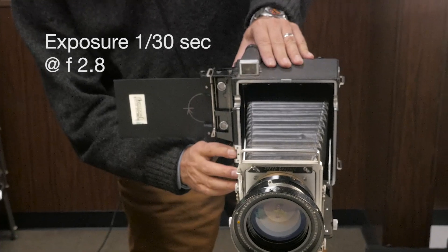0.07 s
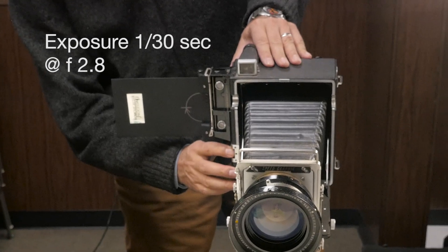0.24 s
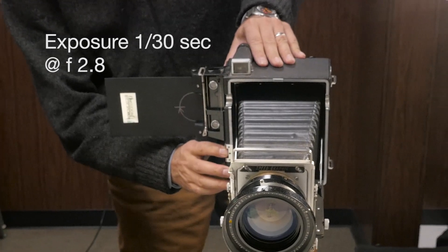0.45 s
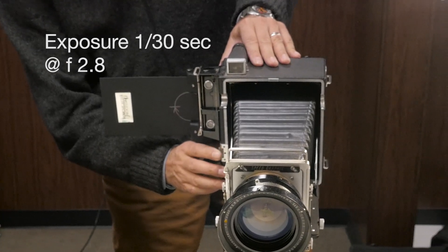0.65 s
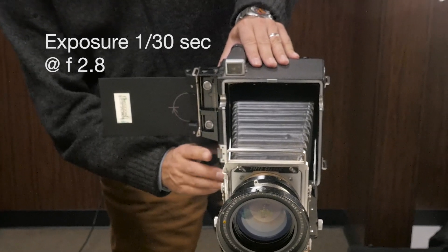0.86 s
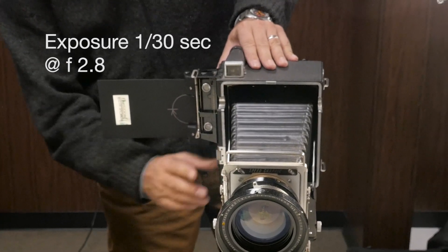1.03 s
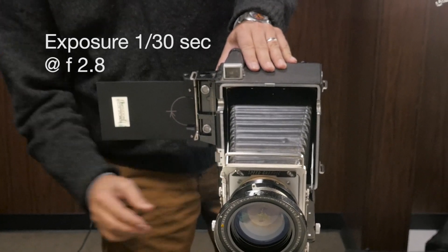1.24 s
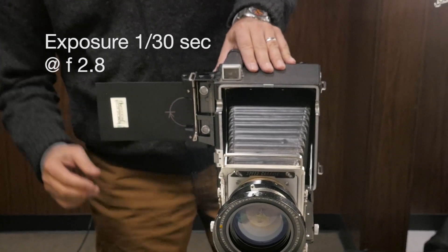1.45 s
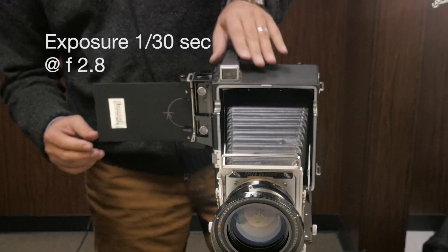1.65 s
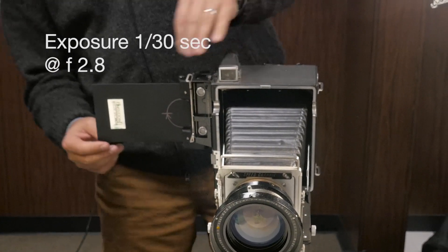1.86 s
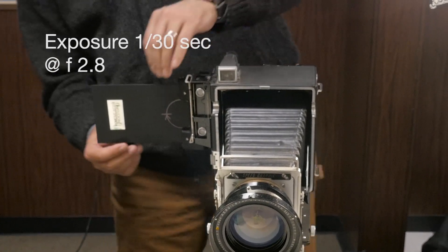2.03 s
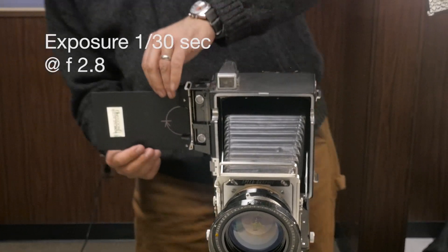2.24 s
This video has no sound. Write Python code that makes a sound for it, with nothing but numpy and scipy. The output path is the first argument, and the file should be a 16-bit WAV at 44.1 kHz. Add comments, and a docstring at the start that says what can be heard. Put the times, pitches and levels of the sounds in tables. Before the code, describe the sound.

Close stereo microphone in a small room: a spring-driven camera shutter runs with a ratcheting whirr and hard metallic clack, a low bump, a second brief clack, then faint taps, cloth rustle and soft bumps.

```python
"""A small room, where the spring-driven curtain shutter of a large-format camera runs twice.
Each run is a whirr: random tooth ticks and scrape noise through case resonances.
It ends in a clack against the stop: filtered noise bursts over a ringing frame. A catch pings at the first release.
Dull low thuds fall between the runs and, fainter, later on.
Then come light taps of handling, made of band-shaped noise, and a shuffle of clothing, over quiet room noise."""
import sys
import numpy as np
from scipy import signal
from scipy.fft import rfft, irfft
from scipy.io import wavfile

SR = 44100
rng = np.random.default_rng(int(sys.argv[2]) if len(sys.argv) > 2 else 0)


def wav_out(sig):
    """Save sig, one row per channel (or a flat mono array), as 16-bit PCM at SR to the path in sys.argv[1]."""
    wavfile.write(sys.argv[1], SR, np.round(np.clip(np.atleast_2d(sig).T, -1, 1) * 32767).astype(np.int16))


N = 101429

# Room noise spectrum. Each row: frequency in Hz, relative density in dB per Hz.
AIR_SPECTRUM = [(10, -32), (25, -3), (50, -2), (90, -5), (115, -15.5), (150, -12.5), (195, -21), (240, -18),
                (450, -22), (800, -24), (1600, -28.5), (3500, -31), (8000, -34), (15500, -34)]
# Stereo likeness of the room noise. Each row: frequency in Hz, left-right correlation.
AIR_LIKENESS = [(60, 0.94), (180, 0.69), (550, 0.52), (1650, 0.25), (4970, 0.43), (15000, -0.32)]
AIR_RMS_DB = -61.5

# Decay of the room. Each row: frequency in Hz, T60 in s.
ROOM_T60 = [(150, 0.43), (500, 0.29), (1500, 0.23), (4000, 0.29), (8000, 0.33), (14000, 0.18)]
# Left-right correlation set for the tail, wider in the top treble. Each row: frequency in Hz, correlation.
TAIL_LIKENESS = [(100, .5), (500, 0.79), (2000, 0.57), (5000, 0.93), (9000, 0.45), (15000, .2)]
ROOM_ONSET_S = 0.005
WHIRR_ROOM_DB, CLACK_ROOM_DB, HAND_ROOM_DB = -1.5, -5.5, -3.5

# Shuffle of clothing. Each row: time in s, low brush level in dB, upper rustle level in dB.
SHUFFLE = [(1.42, -81, -75), (1.52, -79, -64.5), (1.565, -64, -66.5), (1.578, -52.5, -63.5),
           (1.604, -52, -70), (1.629, -62.5, -76.5), (1.72, -60.5, -71.5), (1.78, -68, -73.5),
           (1.899, -74, -91)]
# Low brush spectrum. Each row: frequency in Hz, relative density in dB per Hz.
BRUSH_SPECTRUM = [(40, -26), (110, 5), (300, 1), (620, -5.5), (900, -7), (2000, -39), (8000, -58)]
# Upper rustle spectrum. Each row: frequency in Hz, relative density in dB per Hz.
RUSTLE_SPECTRUM = [(300, -21), (700, -19), (1050, -0.5), (1800, -8), (3000, -18), (8000, -36)]
# Taps and knocks of handling. Each row: start in s, level in dB, centre in Hz, width in octaves, T60 in s.
TAPS = [(1.3869, -29, 2000, 0.2, 0.018), (1.3871, -35, 1170, 0.31, 0.018), (1.3869, -31, 4070, 0.33, .02),
        (1.490, -33.5, 1150, 0.22, 0.032), (1.531, -27.5, 1220, 0.42, 0.016),
        (1.5318, -42, 5500, 0.17, 0.055), (1.532, -35, 2300, 0.38, 0.038), (1.573, -30.5, 650, 0.33, 0.098),
        (1.576, -36, 3000, 0.59, .1), (1.674, -33.5, 2680, 0.87, 0.13)]

# Dull bumps through the stand. Each row: start in s, level in dB.
BUMPS = [(0.488, -20), (0.511, -25.5), (0.7206, -40.5), (1.811, -49), (1.875, -53)]
# After-swing of the stand. Each row: frequency in Hz, level re bump in dB, T60 in s.
STAND_MODES = [(45, -12, 0.3), (82, -26, 0.27)]
THUD_HZ, THUD_PEAK_S, THUD_SHARPNESS = 71.4, 0.013, 2.84
STAND_RISE_S, KNOCK_HZ, KNOCK_DB, KNOCK_T60_S = 0.038, 151, -12, 0.03

# Release catch modes. Each row: frequency in Hz, level re CATCH_DB in dB, T60 in s.
CATCH_MODES = [(2576, 1.5, 0.049), (2960, -4, 0.063), (3177, 3.5, 0.036)]
CATCH_S, CATCH_DB = 0.002, -38
# Curtain coming to rest. Each row: start in s, frame ring level in dB.
STOPS = [(.2812, -42), (.6288, -42.5)]
# Frame modes. Each row: frequency in Hz, dB re ring level at the first stop, same at the second, T60 in s.
FRAME_MODES = [(416, -5.5, -1.5, 0.13), (630.6, -2, -1.5, 0.2), (798, 1.5, -23, 0.14), (910, -1, -21, 0.14),
               (1008, 3, -10, 0.069), (1234, -15, -8.5, 0.24), (1320, 9, -7, 0.058), (1794, 4.5, 8, 0.068),
               (2090, 10, -6, 0.061), (2445, 1, -2, 0.066), (2733, -19, -12, 0.051), (3260, -9, 4.5, 0.059),
               (3545, 0, -1, 0.079), (5300, -6, -8, 0.17)]

# Gear train in the first run. Each row: time in s, level in dB before WHIRR_DB, treble re level in dB.
FIRST_RUN = [(0.0, -43.5, -3.5), (0.016, -53.5, 8.5), (0.032, -49.5, -18), (0.054, -45.5, -2.5),
             (0.166, -43.5, -5.5), (0.18, -48.5, -2), (0.194, -42.5, -6.5), (0.272, -43.5, 0)]
# Gear train in the second run. Each row: time in s, level in dB before WHIRR_DB, treble re level in dB.
SECOND_RUN = [(.54, -68, -8), (.565, -64.5, -1.5), (.588, -57, -2), (.605, -50, -5.5), (.623, -46.5, -3)]
# Whirr spectrum beneath the resonances. Each row: frequency in Hz, relative density in dB per Hz.
WHIRR_SPECTRUM = [(60, -62), (150, -37), (350, -16.5), (650, -10.5), (850, -4), (1100, -4), (1500, -11),
                  (2000, -5.5), (2900, -12.5), (5000, -14), (6600, -22.5), (8700, -26), (10500, -35),
                  (15500, -39)]
# Case resonances. Each row: centre in Hz, width in Hz, level in dB before CASE_DB.
CASE_MODES = [(898, 62, -2.5), (1265, 70, -0.5), (1540, 27, -12), (1853, 146, -3.5), (2340, 58, -16),
              (3330, 130, -9), (4000, 38, -8), (4250, 43, -21), (4565, 85, -5), (4850, 27, -11),
              (5500, 110, -12)]
# Thin singing of the spring roller. Each row: centre in Hz, width in Hz, level in dB before the run's gain.
ROLLER_MODES = [(7330, 200, 2.5), (8200, 390, -1.5)]
TEETH_PER_S, TOOTH_SCATTER_DB, SCRAPE_GAIN = 600, 4, 0.31
CASE_DB, WHIRR_DB, RUN_OUT_S = 3, -2.5, 0.014

# Release snaps, stop blows and rebounds.
# Each row: start in s, level in dB, brightness tilt in dB per octave (above the pivot), bass shelf in dB.
BLOWS = [(.0030, -25, -3, -17), (0.0136, -20.5, 0, -10), (0.2741, -19, -8, -15), (.2790, -10.5, 1, -14),
         (.2810, -7.5, -2, -11), (.2835, -13.5, 0, 6), (0.2883, -14.5, 4, 7.5), (.2925, -16, -1, 9),
         (.3055, -23.5, 3, 9), (0.315, -25, 0, 11), (.6268, -13.5, 1, -9.5), (0.6291, -11, -0.3, -9),
         (.6322, -13.5, -.5, -3.5), (0.6341, -16, 0, 3), (0.6403, -19.5, 0.2, -0.5), (.655, -26.5, 7, 0)]
# Clack spectrum before tilt and bass. Each row: frequency in Hz, relative density in dB per Hz.
CLACK_SPECTRUM = [(40, -71), (120, -26.5), (250, -5), (450, -5), (900, 2), (1600, -1), (2200, -0.5),
                  (3000, -4.5), (4000, -1.5), (5500, -8.5), (7000, -10.5), (10000, -23.5), (15500, -31)]
BLOW_T60_S, CONTACT_RISE_S, BASS_HZ = 0.017, 0.00074, 597

EDGE_HZ = 15720


def amp(db):
    """Decibels to gain."""
    return 10 ** (np.asarray(db) / 20)


def unit(x):
    """Scales to an rms of one."""
    return x / np.sqrt(np.mean(x ** 2) + 1e-20)


def read(points, hz):
    """Interpolates a table on a log-frequency axis."""
    f, value = np.transpose(points)
    return np.interp(np.log(hz + 1), np.log(f + 1), value)


def add(mix, start_s, sound):
    """Mixes a sound in at a time."""
    part = mix[max(round(start_s * SR), 0):][:len(sound)]
    part += sound[:len(part)]


def colour(x, db_at, size=4096):
    """Minimum-phase filter of unit energy, shaped like db_at(Hz)."""
    hz = abs(np.fft.fftfreq(size, 1 / SR))
    log_gain = np.log(amp(np.maximum(db_at(hz), -100)))
    min_phase = np.exp(np.conj(signal.hilbert(log_gain)))
    taps = np.fft.ifft(min_phase).real
    return signal.fftconvolve(x, taps / np.linalg.norm(taps))[:len(x)]


def ring(modes, rise_s):
    """Dying sines of a struck object, building up exponentially over the contact."""
    t = np.arange(SR // 2) / SR
    sines = sum(amp(db - 60 * t / t60) * np.sin(2 * np.pi * hz * t) for hz, db, t60 in modes)
    return (1 - np.exp(-t / rise_s)) * sines


def burst(t60_s):
    """A short rattling contact: decaying noise of unit energy."""
    t = np.arange(SR // 2) / SR
    x = rng.standard_normal(len(t)) * amp(-60 * t / t60_s) * (1 - np.exp(-t / CONTACT_RISE_S))
    return x / np.linalg.norm(x)


def grains(per_s, scatter_db):
    """Random ticks of uneven size and either sign, at unit rms."""
    ticks = rng.random(N) < per_s / SR
    sign = rng.choice([-1, 1], N)
    size_db = scatter_db * np.clip(rng.standard_normal(N), -2, 2)
    return unit(ticks * sign * amp(size_db))


def pair(a, b, likeness):
    """Two channels of a given likeness from two unrelated signals."""
    likeness = np.clip(likeness, -1, 1)
    mid = a * np.sqrt((1 + likeness) / 2)
    side = b * np.sqrt((1 - likeness) / 2)
    return np.array([mid + side, mid - side])


def in_room(x, wet_db):
    """Direct sound plus a diffuse stereo tail, each band dying at its own speed."""
    hz, t, noise = signal.stft(rng.standard_normal((2, SR // 2)), SR, nperseg=256)
    noise = pair(*noise, read(TAIL_LIKENESS, hz)[:, None])
    decay = amp(-60 * t / read(ROOM_T60, hz)[:, None])
    tail = signal.istft(noise * decay, SR, nperseg=256)[1]
    tail = tail * np.minimum(np.arange(tail.shape[1]) / SR / ROOM_ONSET_S, 1) ** 2
    tail = tail / np.linalg.norm(tail[0])
    return x + amp(wet_db) * signal.fftconvolve(x[None], tail, axes=1)[:, :N]


def air():
    """Steady room rumble and faint hiss: shaped stereo noise."""
    hz = np.fft.rfftfreq(N, 1 / SR)
    noise = pair(*rfft(rng.standard_normal((2, N))), read(AIR_LIKENESS, hz))
    x = irfft(noise * amp(read(AIR_SPECTRUM, hz)), N)
    return amp(AIR_RMS_DB) * x / np.std(x.mean(0))


def clothing():
    """Rubbing cloth: dense grains in a low brush and an upper rustle."""
    out, t = np.zeros(N), np.arange(N) / SR
    s, brush_db, rustle_db = np.transpose(SHUFFLE)
    for db, spectrum in (brush_db, BRUSH_SPECTRUM), (rustle_db, RUSTLE_SPECTRUM):
        level = amp(np.interp(t, s, db, left=-120, right=-120))
        out += level * colour(grains(per_s=1600, scatter_db=1.5), lambda hz: read(spectrum, hz))
    return out


def handling_taps():
    """Light taps and knocks of handling: noise bursts, each in its own band."""
    out = np.zeros(N)
    for s, db, centre_hz, octaves, t60_s in TAPS:
        def tone(hz):
            offset = np.log2((hz + 1) / centre_hz) / octaves
            band_db = -10 * np.log10(1 + offset ** 4)
            return band_db - 12 * np.maximum(np.log2((hz + 1) / 7000), 0)
        add(out, s, amp(db) * colour(burst(t60_s), tone))
    return out


def bumps():
    """Each soft push is a short low thud and knock, after which the stand swings on."""
    out, t = np.zeros(N), np.arange(SR // 2) / SR
    u = t / THUD_PEAK_S
    thud = -(u * np.exp(1 - u)) ** THUD_SHARPNESS * np.sin(2 * np.pi * THUD_HZ * t)
    swing = ring(STAND_MODES, STAND_RISE_S)
    knock = ring([(KNOCK_HZ, KNOCK_DB, KNOCK_T60_S)], rise_s=0.0016)
    for s, db in BUMPS:
        add(out, s, amp(db) * (thud + swing - knock))
    return out


def catch_ping():
    """The release catch lets go and its modes die away."""
    out = np.zeros(N)
    add(out, CATCH_S, amp(CATCH_DB) * ring(CATCH_MODES, rise_s=0.001))
    return out


def frame_ring():
    """Each stop excites the same frame modes in different proportion."""
    out = np.zeros(N)
    for k, (s, db) in enumerate(STOPS):
        modes = [(hz, levels[k], t60) for hz, *levels, t60 in FRAME_MODES]
        add(out, s, amp(db) * ring(modes, rise_s=0.0018))
    return out


def whirr(run, roller_db, split_hz=2500):
    """Gear teeth and the sliding curtain excite the resonances of the case and the roller."""
    s, db, treble_db = np.transpose(run)
    t = np.arange(N) / SR
    drive = grains(TEETH_PER_S, TOOTH_SCATTER_DB) + SCRAPE_GAIN * rng.standard_normal(N)

    def case_db(hz):
        power = amp(read(WHIRR_SPECTRUM, hz)) ** 2
        for modes, gain_db in (CASE_MODES, CASE_DB), (ROLLER_MODES, roller_db):
            for f, width, level_db in modes:
                detune = (hz ** 2 - f ** 2) / (width * (hz + 1))
                power = power + amp(level_db + gain_db) ** 2 / (1 + detune ** 2)
        return 10 * np.log10(power)

    x = colour(drive, case_db)
    low = signal.sosfiltfilt(signal.butter(3, split_hz, fs=SR, output="sos"), x)
    treble = amp(np.interp(t, s, treble_db)) * unit(x - low)
    gate = np.interp(t, [s[0] - RUN_OUT_S, s[0], s[-1], s[-1] + RUN_OUT_S], [0, 1, 1, 0])
    return gate * amp(WHIRR_DB + np.interp(t, s, db)) * (unit(low) + treble)


def clacks(pivot_hz=2000):
    """The release snaps; the curtain hits its stop and rebounds, each blow a tilted noise burst."""
    out = np.zeros(N)
    for s, db, tilt_db, bass_db in BLOWS:
        def tone(hz):
            tilt = tilt_db * np.log2(1 + hz / pivot_hz)
            bass = bass_db / (1 + (hz / BASS_HZ) ** 2)
            return read(CLACK_SPECTRUM, hz) + tilt + bass
        add(out, s, amp(db) * colour(burst(BLOW_T60_S), tone))
    return out


def scene():
    """Shutter, handling and clothing in the room."""
    out = air()
    out = out + in_room(clothing() + handling_taps(), HAND_ROOM_DB)
    out = out + in_room(bumps(), wet_db=-16.5) * amp([[0.4], [-0.4]])  # slightly left
    out = out + in_room(catch_ping() + frame_ring(), wet_db=-10)
    runs = whirr(FIRST_RUN, roller_db=-19.5) + whirr(SECOND_RUN, roller_db=-9.5)
    out = out + in_room(runs, WHIRR_ROOM_DB)
    return out + in_room(clacks(), CLACK_ROOM_DB)


def record(dry):
    """The band limit of the recorder: a steep linear-phase low-pass."""
    taps = signal.firwin(511, EDGE_HZ, window=("kaiser", 9), fs=SR)
    return signal.oaconvolve(dry, taps[None], "same", axes=1)


dry = scene()
out = record(dry)
wav_out(out)
```